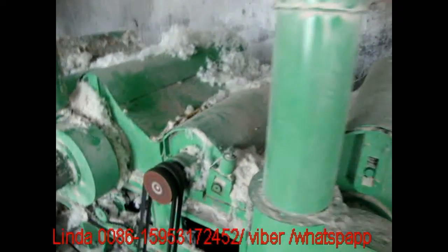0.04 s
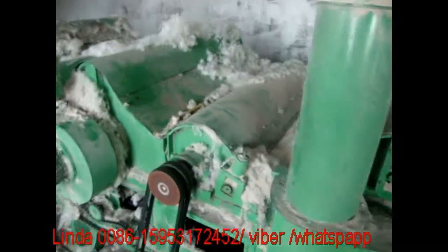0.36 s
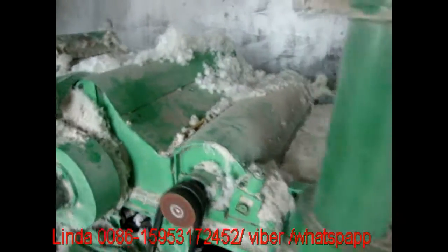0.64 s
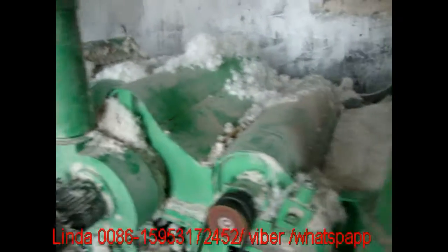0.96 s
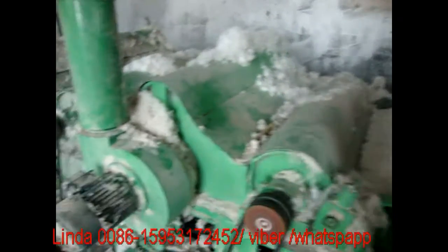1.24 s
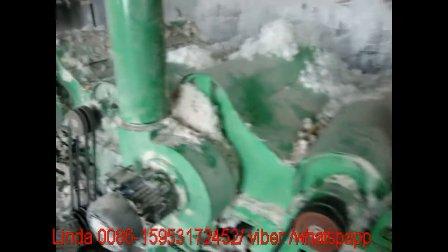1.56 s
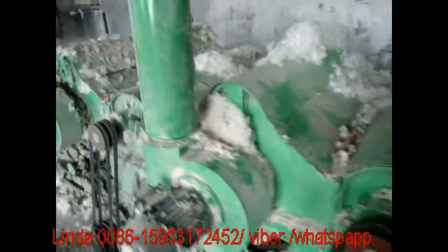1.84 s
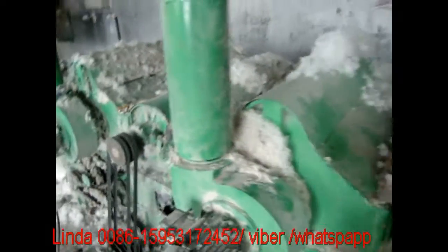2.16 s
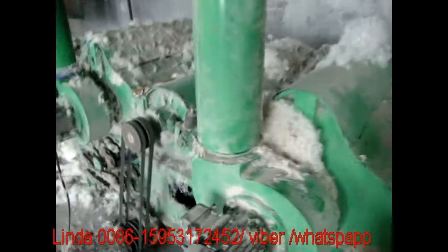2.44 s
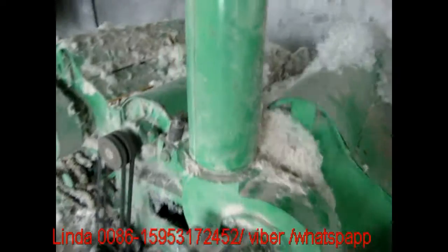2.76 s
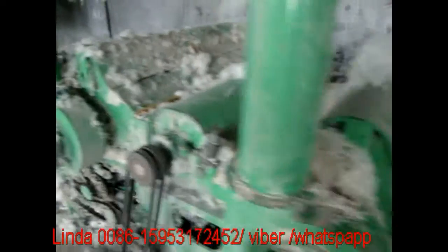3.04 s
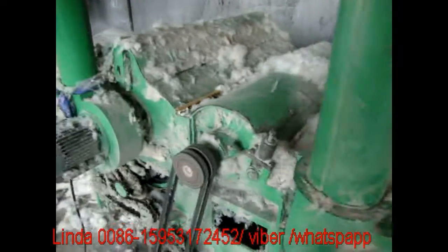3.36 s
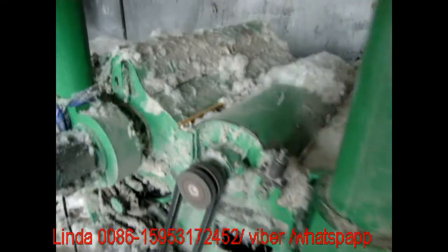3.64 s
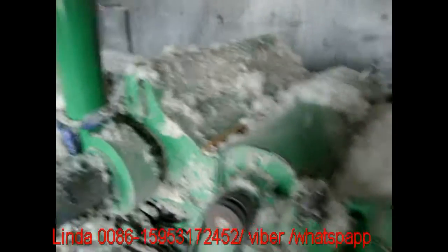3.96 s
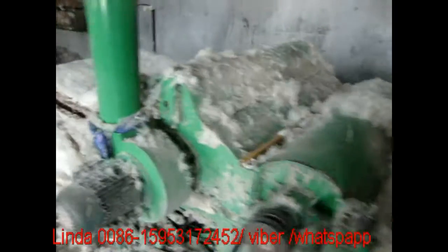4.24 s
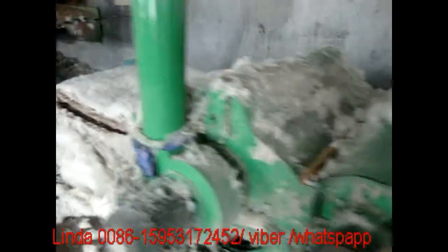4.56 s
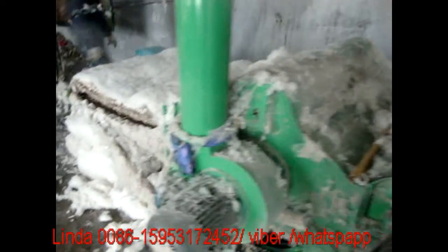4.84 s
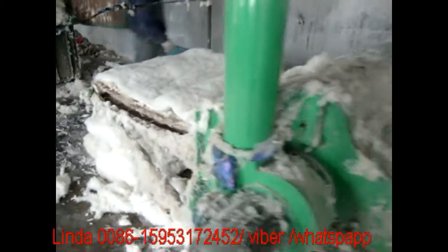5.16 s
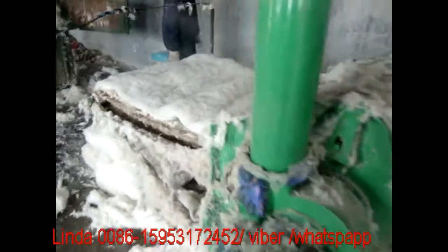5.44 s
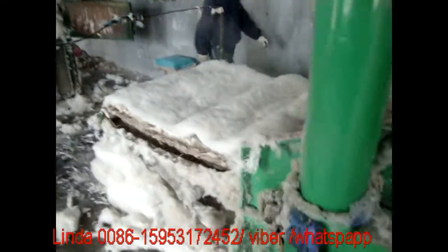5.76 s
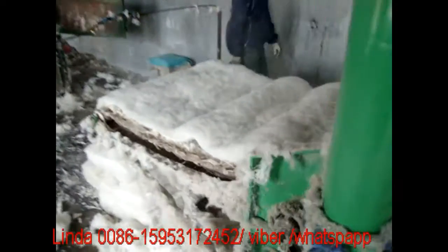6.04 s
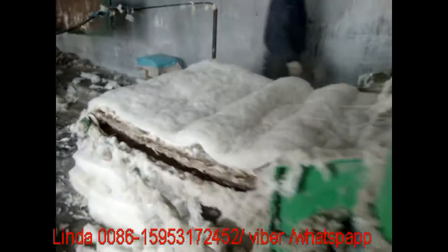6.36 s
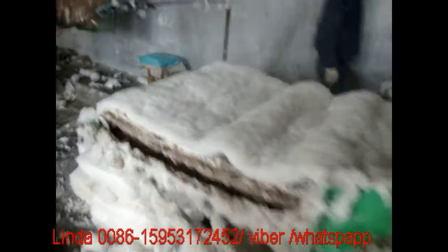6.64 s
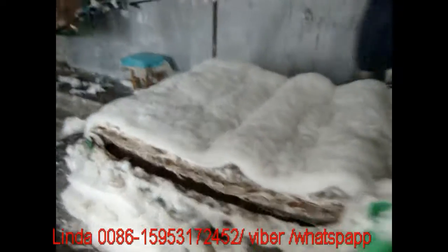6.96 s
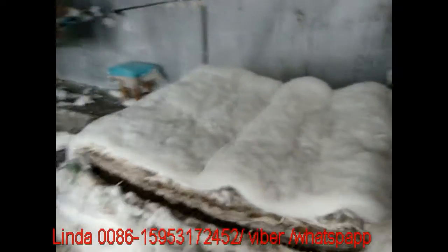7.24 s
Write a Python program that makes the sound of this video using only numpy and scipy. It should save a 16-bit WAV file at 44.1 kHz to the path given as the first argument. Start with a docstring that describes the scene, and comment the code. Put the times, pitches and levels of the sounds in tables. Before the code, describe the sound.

Heard up close while moving along a cloth shredding line in a factory, fans and drums make a continuous, ringing metallic roar. A wavering howl, a thin whistle and a steady whine rise and fall in strength over humming motors and belts. A fine hiss of fibres runs throughout, with short ripping bursts around one second in and again near the middle. The overall loudness barely changes.

```python
"""Textile tearing line

A machine tears cloth in a factory hall, heard by a listener walking along it. Pinned drums and
suction fans roar and howl through their steel housings, a fan whines and motors hum.
Fibres hiss as pins comb them apart, and now and then a tougher scrap of cloth rips."""
import sys
import numpy as np
from scipy import signal
from scipy.fft import rfft, irfft, next_fast_len
from scipy.io import wavfile

SR = 44100
rng = np.random.default_rng(int(sys.argv[2]) if len(sys.argv) > 2 else 0)


def generate_wav(sig):
    """Save sig (samples, or channels by samples) to the path in sys.argv[1] as 16-bit PCM at SR."""
    pcm = np.round(np.clip(np.atleast_2d(sig).T, -1, 1) * 32767).astype(np.int16)
    wavfile.write(sys.argv[1], SR, pcm)


N = 331191
TIME = np.arange(N) / SR
BIN_HZ = np.maximum(np.fft.rfftfreq(2 * next_fast_len(N // 2 + 1), 1 / SR), 1)

# How the walk turns sounds up or down. Each row: time in seconds, then roar, combing and fizz in dB.
WALK_GAINS = [(0.0, 1.7, 1.2, -1.9), (1.4, -0.2, 0.2, -1.8), (1.7, 1.9, 0.5, -0.5), (2.4, -0.6, 1, -0.5),
              (3.1, -0.5, -1.1, -1.7), (3.8, -0.7, -0.5, -1), (4.2, -2, 0, -1.5), (4.7, -0.5, 0.4, -1.5),
              (5.4, -0.5, -0.9, -2), (5.7, -0.0, -0.5, -4), (7.5, 2.0, 0.1, -6)]
# Rushing air, combing pins and the fine fizz of fibres. Each row: frequency in Hz, base level in dB per Hz.
ROAR_SPECTRUM = [(20, -89.5), (50, -91.5), (80, -82), (100, -75.5), (165, -68), (230, -55), (310, -56),
                 (370, -53.5), (560, -49.5), (880, -51), (1250, -48.5), (1550, -53.5), (2200, -63.5),
                 (5000, -78.5)]
COMBING_SPECTRUM = [(600, -91), (1500, -59), (2100, -55), (2800, -56), (3700, -59), (4300, -61),
                    (5100, -61.5), (7000, -72), (10500, -90)]
FIZZ_SPECTRUM = [(2500, -94.5), (5000, -65), (6500, -63.5), (8000, -66), (9200, -66), (10500, -76)]
# Steel housings ringing all along the line. Each row: pitch in Hz, half-width in Hz, level in dB.
HOUSING_RINGS = [(390.4, 11.3, -34.5), (1020, 69, -26.5), (1710, 90, -37.5), (2020, 67, -37.5),
                 (2274, 64, -35.5), (2770, 130, -39.5), (3630, 310, -35.5), (3950, 100, -41),
                 (7440, 270, -45)]
# Ducts and covers heard only up close. Each row: time when nearest in seconds, seconds to fade
# by half, pitch in Hz, half-width in Hz, level when nearest in dB.
NEARBY_DUCTS = [(.5, .8, 750, 63, -32), (2.55, 0.24, 1296, 20, -26.5), (3.6, .25, 2170, 31, -26.5),
                (4.1, 0.38, 2800, 110, -31), (4.9, 0.39, 4840, 110, -34), (6.3, .3, 1171, 15, -22.5),
                (6.9, 0.66, 564.7, 40, -28)]
# The main howl of the drums. Each row: time in seconds, pitch in Hz, base level in dB.
MAIN_HOWL = [(0.0, 1213.1, -25), (0.9, 1209.6, -18.5), (1.4, 1202, -20.5), (2.0, 1211, -23),
             (2.6, 1221, -18), (3.2, 1214, -19), (3.3, 1212, -25), (4.1, 1220, -21.5), (5.2, 1199, -22.3),
             (5.8, 1230, -15.4), (6.2, 1193, -19), (6.4, 1192, -17), (6.8, 1195, -25), (7.0, 1220, -20),
             (7.5, 1207.4, -19)]
# Two higher howls that swell together. Each row: time in seconds, base level in dB.
HIGH_HOWL_LEVELS = [(0.0, -27.1), (0.5, -40), (1.2, -33), (1.4, -31), (2.2, -24.5), (2.4, -31),
                    (3.4, -21.5), (3.7, -25), (5.5, -24), (7.5, -31)]
# Air whistling through a gap. Each row: time in seconds, base level in dB.
GAP_WHISTLE_LEVELS = [(0.0, -32), (0.5, -35.8), (0.8, -28.5), (2.0, -35.4), (2.2, -27.5), (3.0, -29),
                      (3.6, -25), (5.0, -25), (6.0, -37.5), (6.3, -26.5), (7.5, -35)]
# The whine of the fan. Each row: time in seconds, level in dB.
FAN_LEVELS = [(0.0, -34.3), (0.5, -23), (1.1, -27), (1.5, -18.5), (2.3, -30), (3.2, -27), (4.6, -31),
              (4.9, -23.5), (5.2, -37), (7.5, -31)]
# Walking past a motor. Each row: time when nearest in seconds, level there in dB.
NEARBY_MOTORS = [(.1, -33), (7.4, -39)]
# Higher notes in the motor hum. Each row: multiple of the hum's pitch, level in dB.
MOTOR_OVERTONES = [(2, -39), (3, -40.5), (5, -35.5)]
# Steady tones of shafts, belts and bearings. Each row: pitch in Hz, level in dB.
SHAFT_TONES = [(125.2, -65.5), (137.3, -63), (249, -55), (289.4, -56.5), (345.9, -42.5), (516.8, -45),
               (698.5, -44.5), (752.3, -42.5), (1020.1, -36.5), (1611, -40), (1648.6, -46), (2962.2, -50),
               (3892.1, -46), (4600, -51.5), (6499, -52.5)]
# Scraps ripping. Each row: time of the peak in seconds, seconds to swell (and again to fade),
# pitch in Hz, width in Hz, base level at the peak in dB.
CLOTH_RIPS = [(0.693, .04, 6800, 2000, -29), (.91, .04, 7000, 1500, -32), (1.228, 0.037, 6300, 3000, -28),
              (1.321, 0.054, 4000, 2500, -24.5), (2.683, .053, 7500, 3000, -30),
              (3.30, .10, 9200, 2000, -36), (3.367, 0.028, 5800, 700, -29),
              (3.767, 0.0091, 7620, 2500, -24), (3.784, 0.035, 5670, 702, -28),
              (5.266, .037, 7800, 3000, -32)]


def from_db(db):
    """Turn decibels into a number to multiply a sound by."""
    return 10 ** (np.asarray(db) / 20)


def rms_one(x):
    """Scale a signal so that its average strength (rms) is 1."""
    return x / np.sqrt(np.mean(x ** 2) + 1e-20)


def in_time(rows):
    """Join a table's points with straight lines: one curve for each column after the time."""
    seconds, *columns = np.transpose(rows)
    return [np.interp(TIME, seconds, column) for column in columns]


def noise_through(gain):
    """Even, white noise with each frequency turned up or down by its gain."""
    white = rng.standard_normal(2 * (len(BIN_HZ) - 1)) * np.sqrt(SR / 2)
    return irfft(rfft(white) * gain)[:N]


def shaped_noise(spectrum):
    """Noise whose lows and highs follow a spectrum table."""
    hz, db = np.transpose(spectrum)
    return noise_through(from_db(np.interp(np.log(BIN_HZ), np.log(hz), db)))


def ringing(hz, half_width):
    """Noise gathered around one pitch; the narrower it is, the more it sounds like a note."""
    return rms_one(noise_through(1 / (1 + ((BIN_HZ - hz) / half_width) ** 2)))


def drift(rate_hz):
    """A smooth random wobble of size about 1; a higher rate makes it quicker."""
    step, warm_up = 20, 4000
    pole = np.exp(-2 * np.pi * step * rate_hz / SR)
    noise = rng.standard_normal(N // step + warm_up + 2)
    smooth = signal.lfilter([1], [1, -2 * pole, pole * pole], noise)[warm_up:]
    return np.interp(np.arange(N) / step, np.arange(len(smooth)), rms_one(smooth))


def tone(hz, scatter, spread_hz):
    """A pure note blurred by swirling air and the hall; scatter is the blurred share, 0 to 1."""
    phase = 2 * np.pi * (np.cumsum(hz + np.zeros(N)) / SR + rng.random())
    steady = np.sqrt(2 * (1 - scatter)) * np.cos(phase)
    blurred = drift(spread_hz) * np.cos(phase) + drift(spread_hz) * np.sin(phase)
    return steady + np.sqrt(scatter) * blurred


def passing(nearest_s, reach_s):
    """Gain of something we walk past: 1 when nearest, a half reach_s before and after."""
    return 1 / (1 + ((TIME - nearest_s) / reach_s) ** 2)


def air_roar(near_db):
    """Air driven through the ducts roars and keeps the steel housings ringing."""
    roar = shaped_noise(ROAR_SPECTRUM) * from_db(near_db + 0.15 * drift(12))
    return roar + sum(from_db(db) * ringing(hz, half_width) for hz, half_width, db in HOUSING_RINGS)


def steel_echoes(sound, echo_db, shortest_s, longest_s, sway_s, count=6):
    """Sound bounces off covers and pipes; the paths change as we walk, so its colour shifts."""
    out = sound.copy()
    for delay in np.geomspace(shortest_s, longest_s, count):
        echo = np.interp(TIME - delay - sway_s * drift(0.307), TIME, sound, left=0)
        out += from_db(echo_db) * echo
    return out / np.sqrt(1 + count * from_db(echo_db) ** 2)


def fibre_hiss(combing_db, fizz_db):
    """Pins comb the cloth apart; uneven feeding makes the hiss flutter, snapping threads add grain."""
    feed = drift(4.8)
    combing = shaped_noise(COMBING_SPECTRUM) * from_db(combing_db + 0.72 * feed + 0.5 * drift(40))
    fizz = shaped_noise(FIZZ_SPECTRUM)
    flutter_db = 0.56 * feed + 0.95 * drift(25)
    grain_db = 1.4 * drift(300)
    return combing + fizz * from_db(fizz_db + flutter_db + grain_db)


def ducts():
    """Single ducts and covers ring, each growing louder and fading as we go by."""
    return sum(from_db(db) * passing(nearest_s, reach_s) * ringing(hz, half_width)
               for nearest_s, reach_s, hz, half_width, db in NEARBY_DUCTS)


def wandering(hz, stray_hz=6):
    """Uneven airflow makes a pitch stray slowly up and down."""
    return hz + stray_hz * drift(0.803)


def howl(hz, core_hz, rough_hz, rough_share, scatter, waver_hz):
    """An air tone: a narrow, wavering core (spread core_hz) in a wider, rough band (rough_hz)."""
    core = tone(hz + waver_hz * drift(4.017), scatter, spread_hz=core_hz)
    rough = tone(hz, scatter=0.92, spread_hz=rough_hz)
    return np.sqrt(1 - rough_share) * core + np.sqrt(rough_share) * rough


def drums():
    """Spinning drums drag air past the edges of their covers, making three howls and a whistle."""
    main_hz, main_db = in_time(MAIN_HOWL)
    pair_db, = in_time(HIGH_HOWL_LEVELS)
    whistle_db, = in_time(GAP_WHISTLE_LEVELS)
    main = howl(main_hz, core_hz=21, rough_hz=58.5, rough_share=0.47, scatter=0.54, waver_hz=13)
    middle = howl(wandering(1355), core_hz=22, rough_hz=45, rough_share=0.98, scatter=0.79, waver_hz=6.28)
    upper = howl(wandering(1418), core_hz=22.1, rough_hz=45, rough_share=0.45, scatter=0.93,
                 waver_hz=6.01)
    whistle = howl(wandering(2194), core_hz=25, rough_hz=50, rough_share=0.58, scatter=1, waver_hz=6.02)
    throb_db = 0.4 * drift(16)  # the main howl surges as the load on the drums changes
    return (from_db(main_db - 0.7 + throb_db) * main + from_db(pair_db - 1.8) * middle
            + from_db(pair_db - 0.2) * upper + from_db(whistle_db - 0.1) * whistle)


def fan_whine():
    """A fan at steady speed holds one note, which swells and fades as we walk."""
    level_db, = in_time(FAN_LEVELS)
    return from_db(level_db) * tone(hz=985.1, scatter=0.22, spread_hz=7)


def motor_hum(hz=219.6):
    """Motors hum at one pitch; the low note is loudest nearby, its overtones carry everywhere."""
    nearness = sum(from_db(db) * passing(nearest_s, reach_s=1.34) for nearest_s, db in NEARBY_MOTORS)
    hum = nearness * tone(hz, scatter=0.28, spread_hz=1)
    return hum + sum(from_db(db) * tone(multiple * hz, scatter=0.49, spread_hz=3.7)
                     for multiple, db in MOTOR_OVERTONES)


def shafts():
    """Shafts, belts and bearings turn at steady speeds, so their notes keep their pitch."""
    return sum(from_db(db) * tone(hz, scatter=0.42, spread_hz=1.8) for hz, db in SHAFT_TONES)


def rips(ragged_db):
    """Each tough scrap gives way in a short, ragged burst of hiss that swells and fades."""
    out = np.zeros(N)
    for peak_s, swell_s, hz, width, db in CLOTH_RIPS:
        swell = np.exp(-2 * ((TIME - peak_s) / swell_s) ** 2)
        out += from_db(db) * swell * ringing(hz, width / 2)
    return out * from_db(ragged_db * drift(120))


def scene():
    """Add up the whole line, the same in the left and right channels."""
    roar_db, combing_db, fizz_db = in_time(WALK_GAINS)
    roar = air_roar(roar_db)
    roar = steel_echoes(roar, echo_db=-19.5, shortest_s=0.009, longest_s=0.045, sway_s=0.001183)
    hiss = fibre_hiss(combing_db, fizz_db)
    hiss = steel_echoes(hiss, echo_db=-18.5, shortest_s=0.002, longest_s=0.009, sway_s=0.000329)
    line = roar + hiss + ducts() + drums() + fan_whine() + motor_hum() + shafts() + rips(ragged_db=3.0)
    return np.stack([line, line])


def record(dry):
    """Round off the tallest peaks and cut away the highest treble."""
    ceiling, cutoff_hz = 0.73, 10060
    rounded = dry / (1 + (dry / ceiling) ** 6) ** (1 / 6)
    low_pass = signal.ellip(14, 0.1, 80, cutoff_hz, fs=SR, output="sos")
    return signal.sosfilt(low_pass, rounded)


dry = scene()
out = record(dry)
generate_wav(out)
```